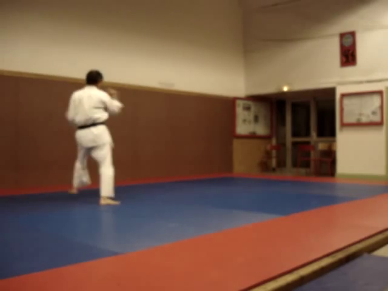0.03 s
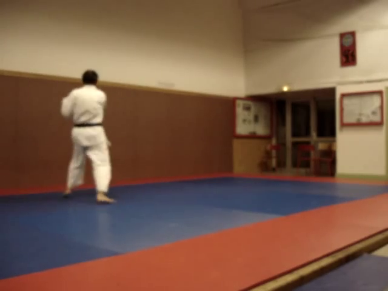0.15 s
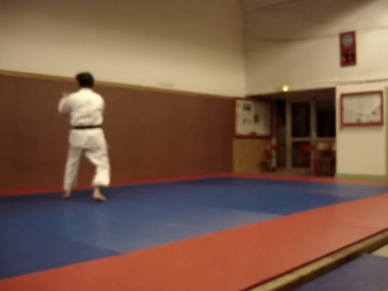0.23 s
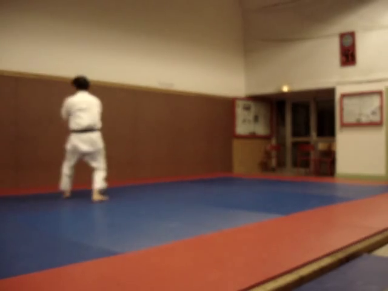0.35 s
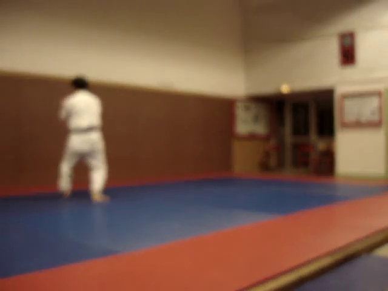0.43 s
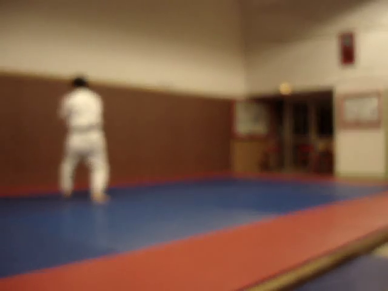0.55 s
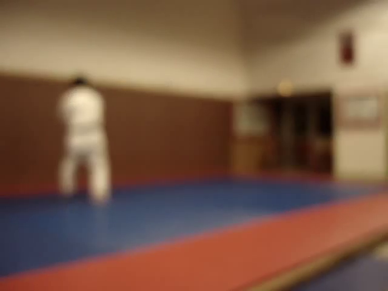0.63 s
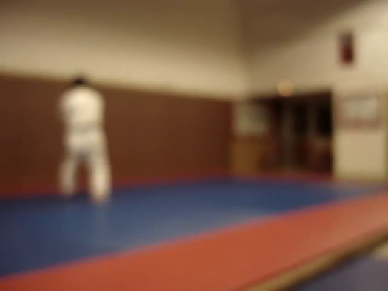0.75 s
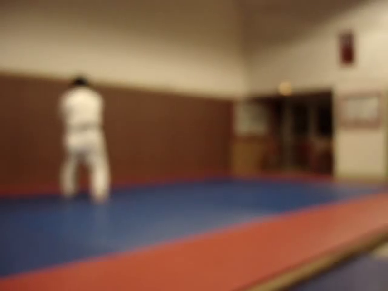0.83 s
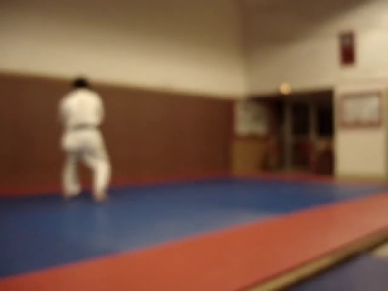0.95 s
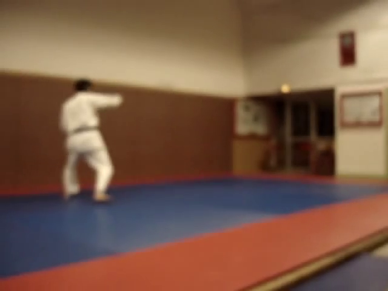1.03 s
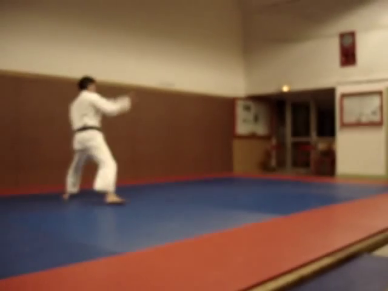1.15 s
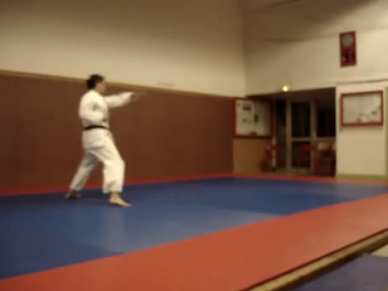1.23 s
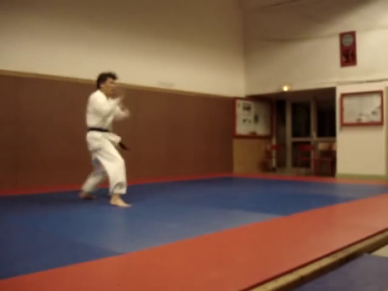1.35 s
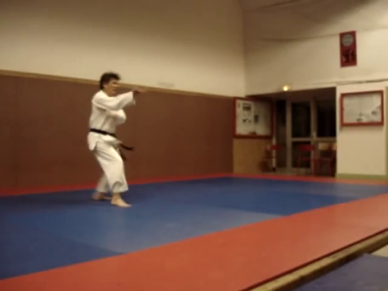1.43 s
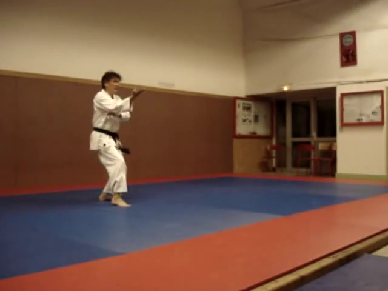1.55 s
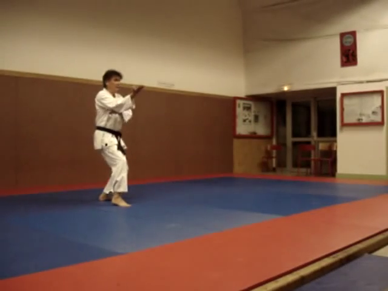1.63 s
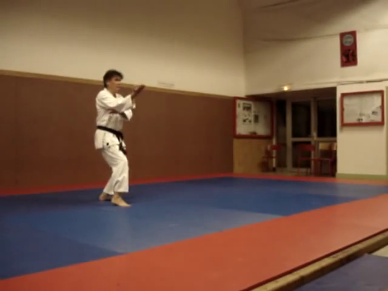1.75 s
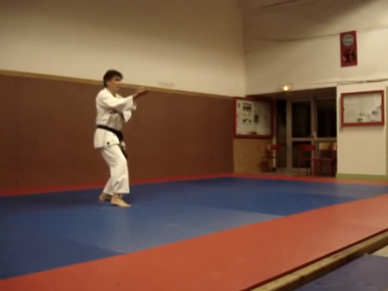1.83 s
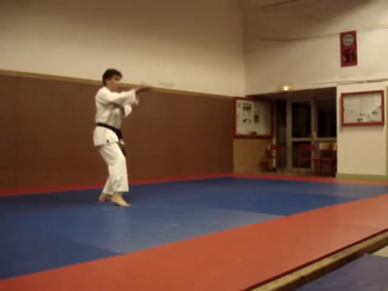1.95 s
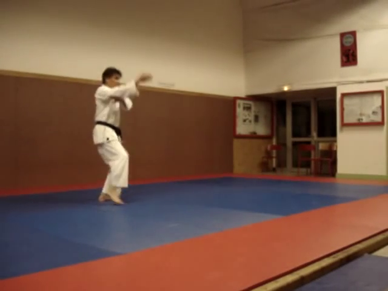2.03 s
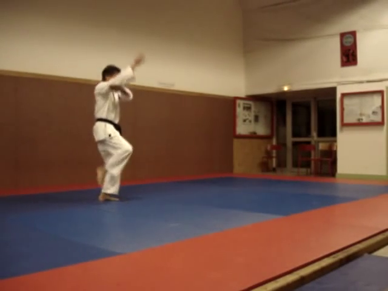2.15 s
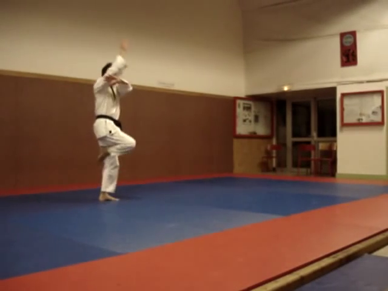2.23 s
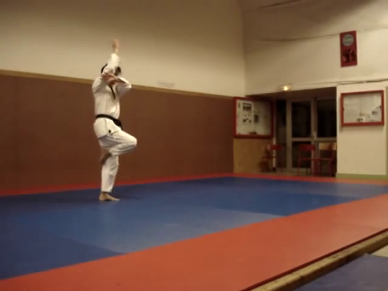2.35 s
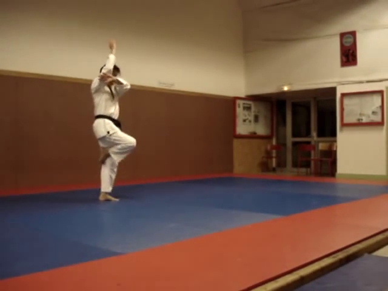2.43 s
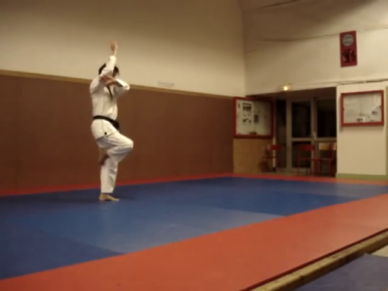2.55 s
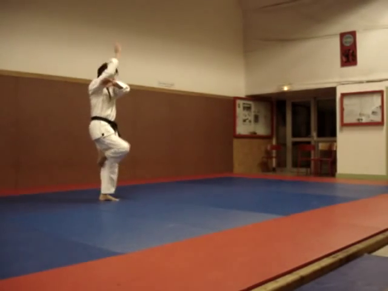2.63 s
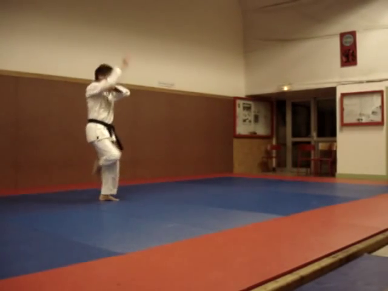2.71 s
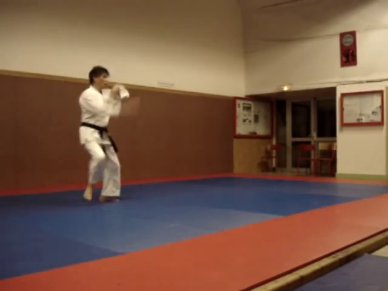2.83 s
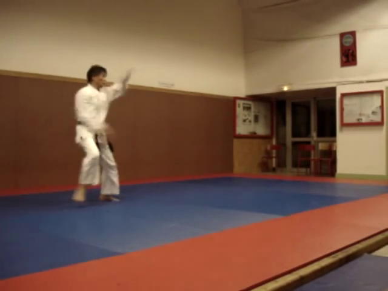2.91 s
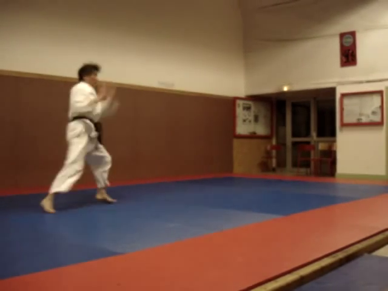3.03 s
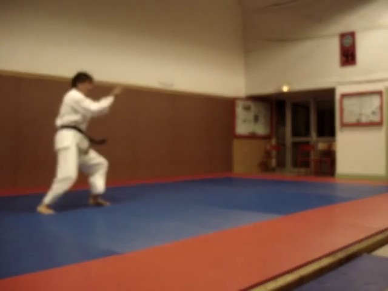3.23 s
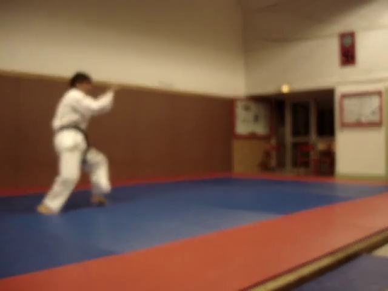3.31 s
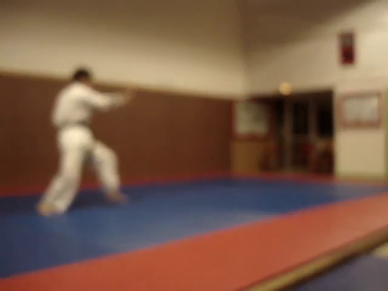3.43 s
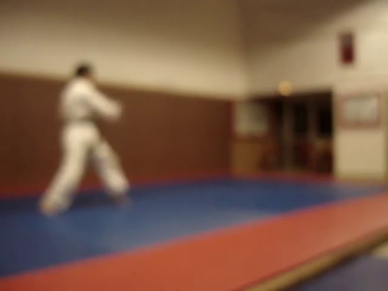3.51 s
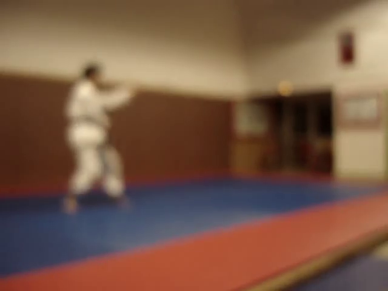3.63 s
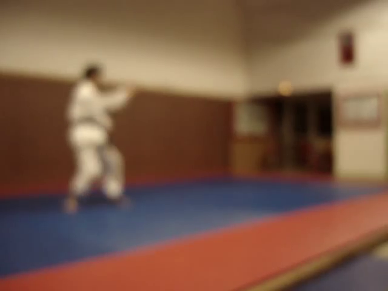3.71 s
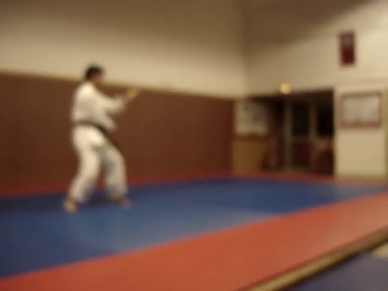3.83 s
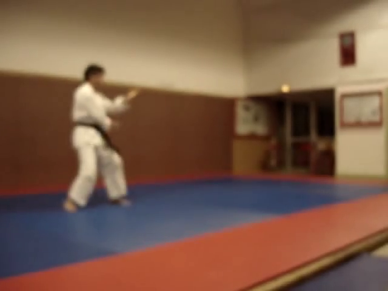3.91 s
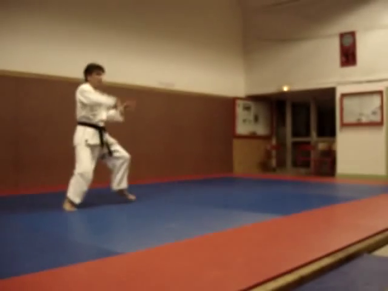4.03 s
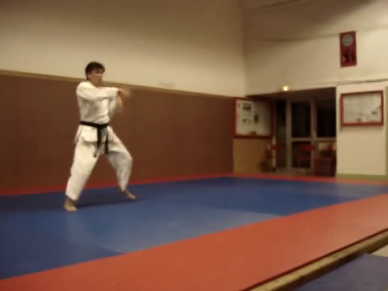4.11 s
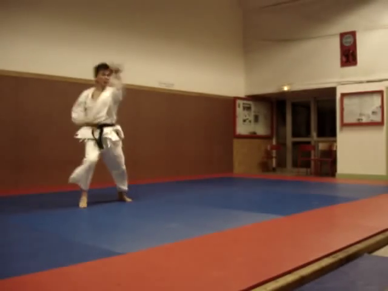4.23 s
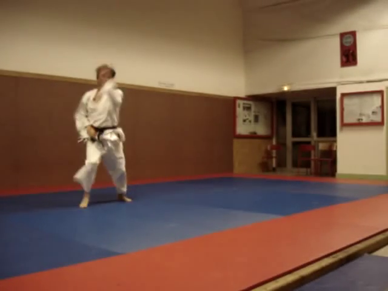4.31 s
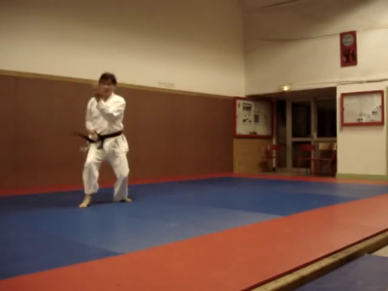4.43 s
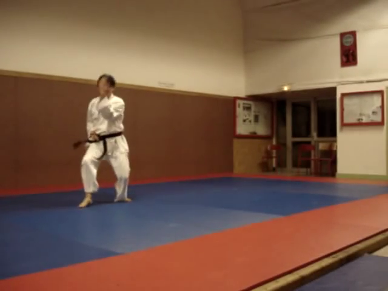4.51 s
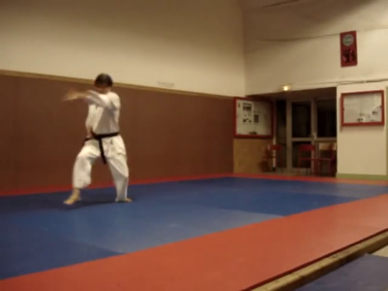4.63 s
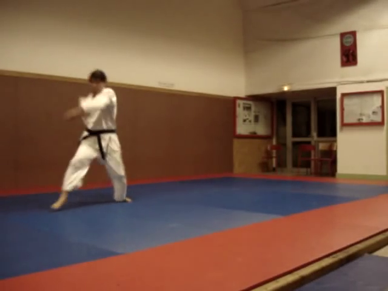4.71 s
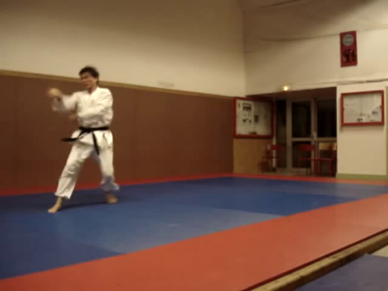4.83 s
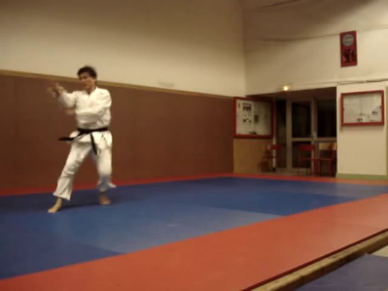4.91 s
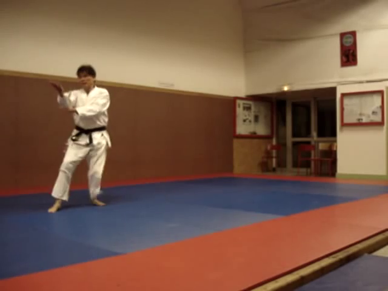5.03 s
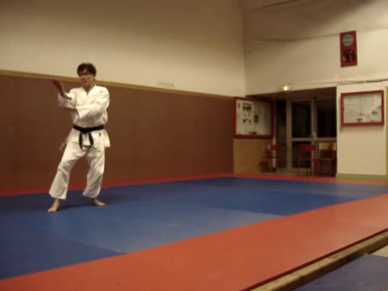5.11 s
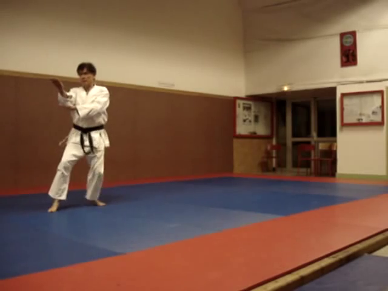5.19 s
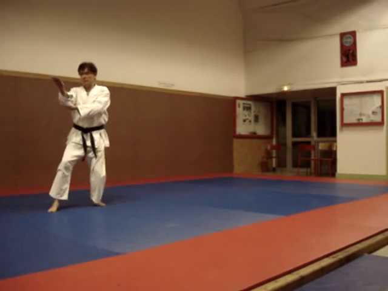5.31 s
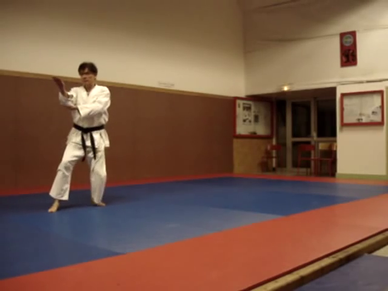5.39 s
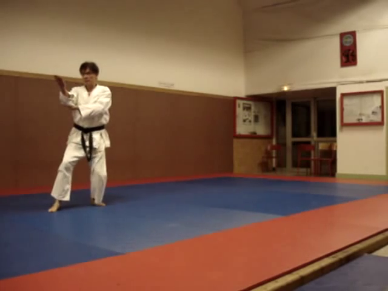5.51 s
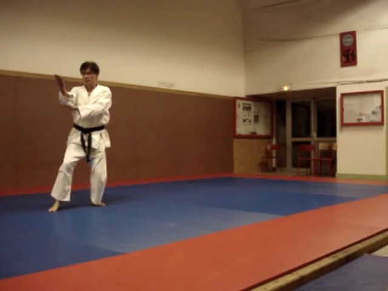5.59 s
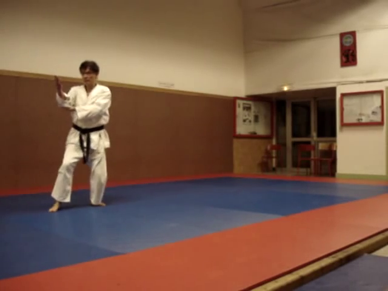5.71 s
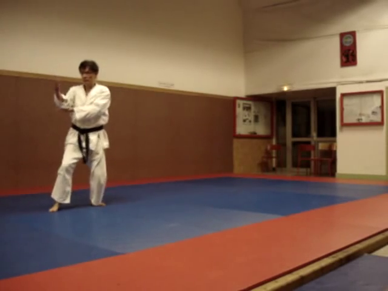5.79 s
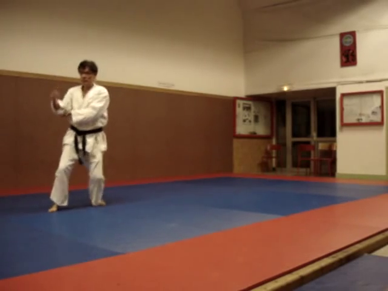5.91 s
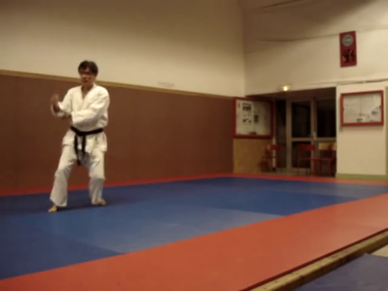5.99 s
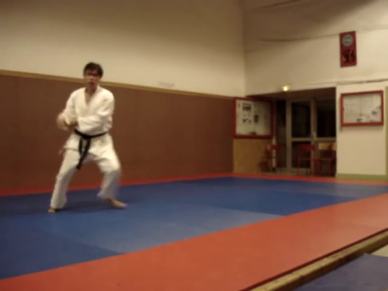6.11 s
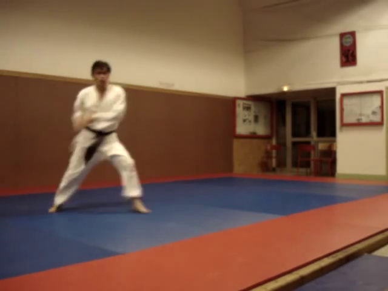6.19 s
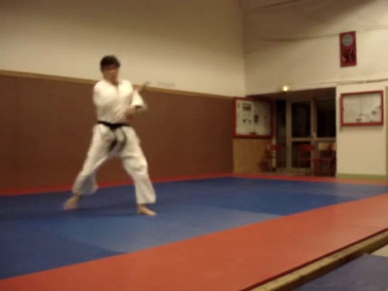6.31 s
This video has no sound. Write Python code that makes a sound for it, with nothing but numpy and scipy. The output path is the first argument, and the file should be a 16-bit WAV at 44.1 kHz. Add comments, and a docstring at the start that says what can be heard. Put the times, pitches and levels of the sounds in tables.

```python
"""A loose cotton suit swishes and cracks through a karate form on foam mats in a bare training hall.
In each move the cloth swishes as the limbs wind up, snaps taut as they lock, then swings on and flaps.
Bare feet thud, slap and slide, and sleeves rub together. The hall rings after every move,
over faint room air and a thin electronic whine from a small camera a few metres away."""
import sys
import numpy as np
from scipy import signal
from scipy.fft import rfft, irfft, next_fast_len
from scipy.io import wavfile
from scipy.ndimage import map_coordinates

SR = 44100
rng = np.random.default_rng(int(sys.argv[2]) if len(sys.argv) > 2 else 0)


def waveform_to_disk(signal):
    """Save audio, clipped to [-1, 1], as 16-bit WAV at the path in sys.argv[1]."""
    frames = np.transpose(np.atleast_2d(signal))
    scaled = np.clip(frames, -1, 1) * 32767
    samples = np.round(scaled).astype(np.int16)
    wavfile.write(sys.argv[1], SR, samples)


N = 280035

# the tone of moving cotton: f/Hz, level/dB
COTTON_TONE = [(30, -33), (120, -19.5), (250, -7.5), (340, -7), (430, 0), (600, -3), (870, 2), (1500, -3.5),
               (2100, -4), (3300, -9), (3900, -14), (5300, -15), (10000, -25.5)]
# karate moves: t/s when the limbs lock, wind-up level/dB, wind-up length/s,
# follow-through level/dB, follow-through length/s, brightness/(dB per octave)
KARATE_MOVES = [(0.15, -32, 0.047, -18, .16, -2.5), (1.332, -32, 0.19, -25, .2, 0.4),
                (2.351, -54, 0.23, -45, 0.056, -2.5), (3.048, -41, .08, -25.5, .22, -1.5),
                (3.73, -27.5, 0.18, -26, .11, -1.1), (4.349, -30, 0.15, -34.5, .12, -3),
                (4.91, -31.5, 0.24, -27, 0.14, -2), (6.33, -34, .16, -38, .1, 3)]
TOP_HZ = 10150  # the highest pitch the camera keeps
TAUT_RISE_S, TAUT_FADE_S = 0.0012, 0.04  # a typical fold pulling taut; fade times are for a 60 dB drop


def amp(db):
    return 10 ** (np.asarray(db) / 20)


def unit(x):
    return x / np.sqrt(np.mean(x ** 2) + 1e-20)


def along(points, hz):
    """Read between (f/Hz, value) points on a log frequency axis."""
    f, values = np.transpose(points)
    return np.interp(np.log(hz + 1), np.log(f + 1), values)


def add(track, s, x):
    """Mix x into the track from second s on."""
    start = round(s * SR)
    x = x[max(-start, 0):max(N - start, 0)]
    track[max(start, 0):][:len(x)] += x


def wobble(rate, size):
    """A smooth curve through rate random points a second."""
    points = rng.standard_normal(int(size * rate / SR) + 4)
    return map_coordinates(points, [np.arange(size) * rate / SR])


def colour(x, tone, tilt_db=0):
    """Filter x to a tone, made brighter by tilt_db an octave."""
    size = 2 * next_fast_len(len(x) // 2 + SR // 20)
    hz = np.fft.rfftfreq(size, 1 / SR)
    lift_db = tilt_db * np.log2(np.clip(hz, 250, 10000))
    gain = unit(amp(along(tone, hz) + lift_db - 40 * (hz > TOP_HZ + SR / 100)))
    # these steps make the filter ring only after a sound, never before it
    cepstrum = irfft(np.log(gain))
    cepstrum[1:size // 2] *= 2
    cepstrum[size // 2 + 1:] = 0
    return irfft(rfft(x, size) * np.exp(rfft(cepstrum)))[:len(x)]


def burst(rise_s, fade_s, spiky_db, crack=0):
    """A flutter of noise that swells and dies; crack adds a sharp click."""
    t = np.arange(SR // 4) / SR
    x = rng.standard_normal(len(t)) * (1 - np.exp(-t / rise_s))
    x *= amp(spiky_db * wobble(865, len(t)) - 60 * t / fade_s)
    x /= np.linalg.norm(x)
    x[int(rise_s * SR)] += crack * np.exp(-rise_s / 0.003)  # only a sudden pull cracks
    return x / np.linalg.norm(x) * np.sqrt(SR / 100)


def room_air():
    """Steady air and hiss, with a thin wavering whine from the camera's electronics."""
    # the tone of the room's air: f/Hz, level/dB
    air_tone = [(15, -67), (25, -8.5), (85, -13), (113, -10.5), (216, -5.5), (356, -4), (384, -4.5),
                (414, -3.5), (574, -6), (1050, -8), (1450, -9), (4480, -13.5), (7980, -18.5), (10000, -25),
                (13000, -61), (22000, -120)]
    air = colour(rng.standard_normal(N), air_tone)
    whine_hz = 8020 + 30 * wobble(120, N)
    whine = np.sin(2 * np.pi * np.cumsum(whine_hz) / SR)
    return amp(-49) * air + amp(-61.5) * whine


def hall(x, early_db, tail_db):
    """The direct sound, early echoes from floor and near walls, and the long ring of the hall."""
    # how long the hall rings: f/Hz, fade time/s
    ring_times = [(80, 0.86), (260, 0.76), (700, 0.97), (2000, 1.647), (4500, 2.28), (10000, 0.82)]
    hz = np.fft.rfftfreq(256, 1 / SR)
    t = np.arange(0, 5 * SR // 4, len(hz) - 1) / SR
    phases = np.exp(2j * np.pi * rng.random((len(hz), len(t))))
    fade = amp(-60 * t / along(ring_times, hz)[:, None])
    tail = signal.istft(phases * fade * (1 - np.exp(-t / 0.018)))[1]
    delays = rng.uniform(0.002, 0.05, 40)
    echoes = rng.standard_normal(len(delays)) * np.exp(-delays / 0.054)
    walls = np.bincount((delays * SR).astype(int), echoes, len(tail))
    response = amp(early_db) * walls / np.linalg.norm(walls) + amp(tail_db) * tail / np.linalg.norm(tail)
    response[0] += 1  # the direct sound
    return signal.fftconvolve(x, response)


def friction(strokes, tone, grain_db, grain_rate):
    """Rubbing swells and fades with the speed of a limb, catching in small grains."""
    out, t = np.zeros(N), np.arange(-SR // 3, SR // 3) / SR
    for s, db, rise_s, fall_s, tilt_db in strokes:
        speed = amp(-16 * np.abs(t / np.where(t < 0, rise_s, fall_s)) ** 1.55)
        grains = unit(rng.standard_normal(len(t)) * amp(grain_db * wobble(grain_rate, len(t))))
        rub = colour(grains * speed, tone, tilt_db)
        add(out, s + t[0], amp(db - 4.5) * hall(rub, early_db=-8.5, tail_db=-1.5))
    return out


def swishes():
    """Two swishes a move: a duller one as the limbs wind up, then the cloth swings on."""
    lead_s, brake_s = 0.035, 0.12  # limbs are fastest just before they lock, then brake
    strokes = []
    for s, wind_db, wind_s, swing_db, swing_s, tilt_db in KARATE_MOVES:
        strokes.append((s - lead_s, wind_db, wind_s, brake_s, tilt_db - 1.5))
        strokes.append((s + 0.7 * swing_s, swing_db, 0.73 * swing_s, swing_s, tilt_db))
    return friction(strokes, COTTON_TONE, grain_db=2.5, grain_rate=300)


def steps():
    """The body's weight thuds into the mats, the bare sole slaps them and the trouser leg billows."""
    # feet landing: t/s, thud level/dB, slap level/dB, thud brightness/(dB per octave)
    landings = [(0.148, -46, -48, -18), (0.36, -39.5, -32, -7), (1.535, -42, -33, 0.5),
                (3.05, -46.5, -27.5, -3), (3.598, -45.5, -44, 3), (3.742, -35.5, -21, -2.5),
                (4.308, -45, -48, 11), (4.857, -41.5, -41, 6.5), (4.99, -49, -26.5, -11),
                (6.324, -35, -31.5, 5.5)]
    # low notes of the mats on the floor: f/Hz, level/dB, fade time/s
    mat_notes = [(33, -23, 0.28), (67.3, -5, 0.29), (90, 0.5, 0.28), (149, -2, 0.18), (180.3, -0.5, 0.17)]
    # the tone of a slapping sole: f/Hz, level/dB
    slap_tone = [(60, -23), (250, -10), (430, -12.5), (700, -7.5), (890, -0.5), (1150, -1.5), (1450, -13.5),
                 (2500, -15.5), (10000, -41)]
    out, t = np.zeros(N), np.arange(SR // 2) / SR
    for s, thud_db, slap_db, tilt_db in landings:
        thud = np.zeros(len(t))
        for hz, db, fade_s in mat_notes:  # the heel drives low notes, the ball of the foot higher ones
            level_db = db + tilt_db * np.log2(hz / 90) + rng.normal(0, 1.8)
            pitch_hz = hz * (1 + rng.normal(0, 0.053))
            thud += amp(level_db - 60 * t / fade_s) * np.sin(2 * np.pi * pitch_hz * t)
        thud *= 1 - np.exp(-t / 0.0026)
        slap = colour(burst(rise_s=0.004, fade_s=0.065, spiky_db=-0.5), slap_tone)
        add(out, s, amp(thud_db) * hall(thud, early_db=-8, tail_db=0.5))
        add(out, s, amp(slap_db) * hall(slap, early_db=2.5, tail_db=-3))
        add(out, s, amp(thud_db) * billow())
    return out


def billow():
    """Loose cloth fills with air: a dull whump."""
    # the tone of billowing cloth: f/Hz, level/dB
    whump_tone = [(30, -15), (110, -34), (170, -15), (240, 0), (430, 1.5), (650, -13), (1500, -33),
                  (10000, -49)]
    whump = colour(burst(rise_s=0.0029, fade_s=0.056, spiky_db=1), whump_tone)
    return hall(whump, early_db=0, tail_db=-1.5)


def snaps():
    """At the end of a strike the loose cloth fills with air and whips taut."""
    # folds cracking taut: t/s, level/dB, brightness/(dB per octave), fade time/s
    folds = [(0.1491, -17, -5, 0.047), (0.1626, -19, 2, 0.023), (0.179, -18, -2, 0.059),
             (0.193, -18, 0, .05), (1.326, -22.5, .5, 0.034), (1.339, -18.5, -0.5, 0.058),
             (1.382, -22.5, 1.5, 0.054), (2.075, -42.5, 5, .08), (2.350, -38, -1.5, 0.031),
             (3.025, -24.5, 0.5, 0.1), (3.051, -18.5, -.5, 0.0345), (3.734, -28, 5, .055),
             (4.227, -29, -1.5, 0.079), (4.271, -29.5, 3.5, 0.18), (4.37, -20.5, 1, 0.018),
             (4.3743, -20.5, -1, 0.017), (4.380, -18.5, -2, .05), (4.413, -22.5, -3.5, 0.07),
             (4.763, -32, 2, 0.091), (4.86, -32, 2.5, 0.011)]
    out = np.zeros(N)
    for s, db, tilt_db, fade_s in folds:
        rise_s = TAUT_RISE_S * (fade_s / TAUT_FADE_S) ** 2  # slack folds pull more slowly
        snap = colour(burst(rise_s, fade_s, spiky_db=3.5, crack=0.3), COTTON_TONE, tilt_db)
        add(out, s, amp(db) * hall(snap, early_db=-2, tail_db=0.5))
        add(out, s, amp(db - 17.5 - 2 * tilt_db) * billow())  # dull folds push more air
    return out


def flaps(count=3, spread_s=0.09):
    """After the limbs lock, a few more folds flap at random moments."""
    out = np.zeros(N)
    for s, _, _, swing_db, _, _ in KARATE_MOVES:
        for k in range(count):
            delay = spread_s * (k + 1 + rng.uniform(-0.5, 0.5)) / count
            flap = burst(TAUT_RISE_S, fade_s=0.03, spiky_db=6, crack=0.84)
            add(out, s + delay, amp(swing_db - 5) * flap)
    return hall(colour(out, COTTON_TONE, tilt_db=0.25), early_db=-6.5, tail_db=0.5)[:N]


def foot_slides():
    """Bare soles hiss as they drag over the mats."""
    # sliding feet: t/s at top speed, level/dB, length/s, brightness/(dB per octave)
    slides = [(0.30, -29, 0.15, -2), (1.56, -39, 0.16, 4.5), (3.115, -26.5, 0.025, 2),
              (3.19, -23.5, 0.027, 1), (3.66, -35, 0.1, -3), (4.95, -21.5, .06, -2.5),
              (5.01, -24, 0.083, 0), (6.32, -26.5, 0.019, 5)]
    # the tone of skin on foam: f/Hz, level/dB
    sole_tone = [(100, -52), (700, -10.5), (1600, -20), (2400, -3.5), (4000, -6.5), (6500, -8),
                 (10000, -14)]
    strokes = [(s, db, 1.13 * length, 0.92 * length, tilt_db) for s, db, length, tilt_db in slides]
    return friction(strokes, sole_tone, grain_db=2.5, grain_rate=280)


def sleeve_rubs():
    """The sleeves rub together as the forearms cross."""
    # rubbing sleeves: t/s at top speed, level/dB, length/s, brightness/(dB per octave)
    rubs = [(1.66, -42, 0.11, 1.5), (4.47, -30, 0.14, -4), (4.72, -48, 0.082, -2)]
    # the tone of cloth on cloth: f/Hz, level/dB
    weave_tone = [(200, -28), (900, -12), (1600, -4.5), (2100, 12), (2900, 4.5), (3700, -23), (10000, -30)]
    strokes = [(s, db, length, 1.25 * length, tilt_db) for s, db, length, tilt_db in rubs]
    return friction(strokes, weave_tone, grain_db=1.5, grain_rate=440)


def scene():
    """Cloth and feet in the hall, heard at one microphone."""
    rubbing = swishes() + sleeve_rubs() + foot_slides()
    return (rubbing + snaps() + flaps() + steps() + room_air())[None]


def record(dry):
    """The camera cuts off the highest treble."""
    size = next_fast_len(N + SR // 2)
    hz = np.fft.rfftfreq(size, 1 / SR)
    gain = np.clip((TOP_HZ - hz) / 200 + 0.5, 0, 1)
    return irfft(rfft(dry, size) * gain, size)[..., :N]


dry = scene()
out = record(dry)
waveform_to_disk(out)
```